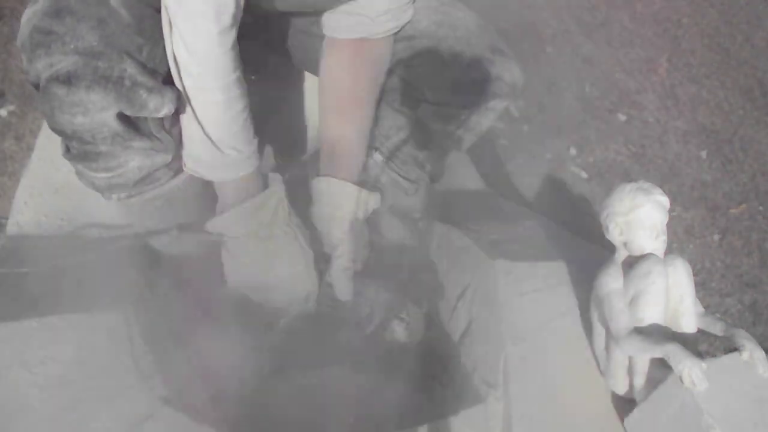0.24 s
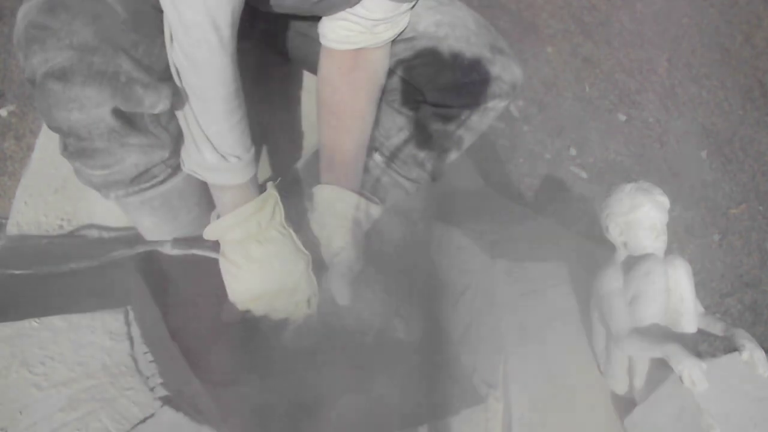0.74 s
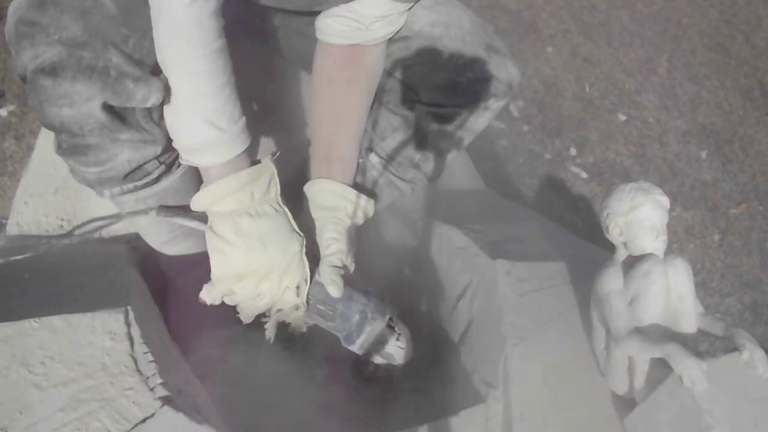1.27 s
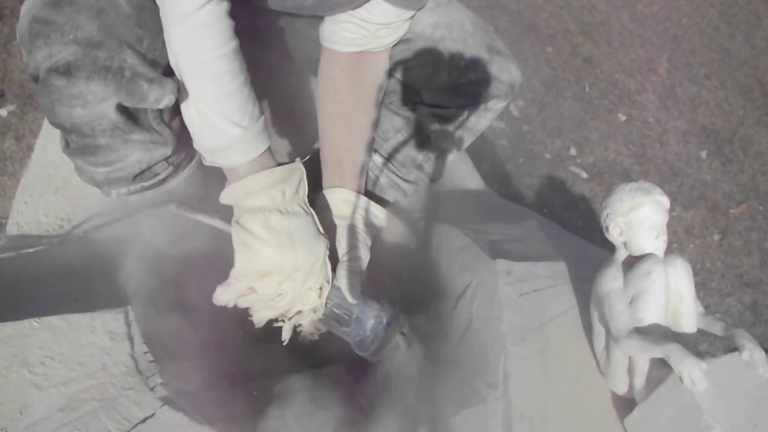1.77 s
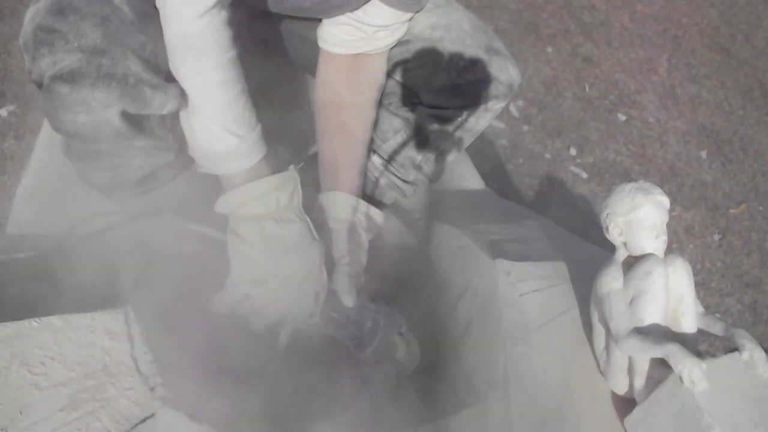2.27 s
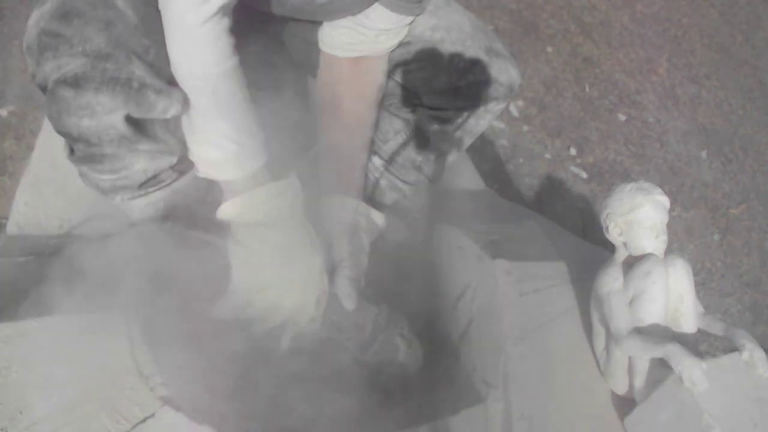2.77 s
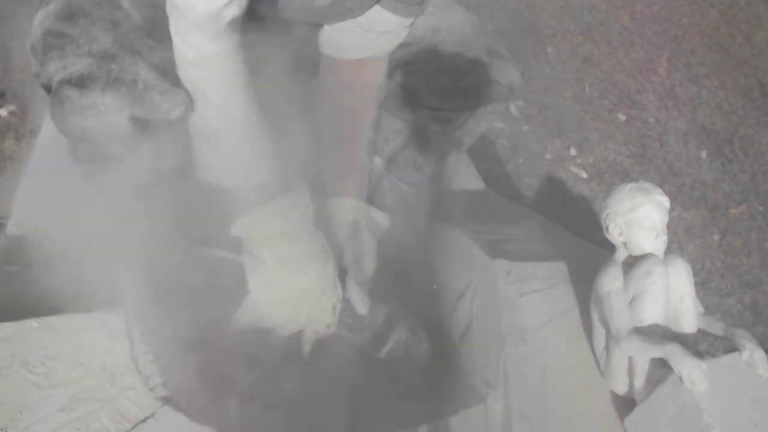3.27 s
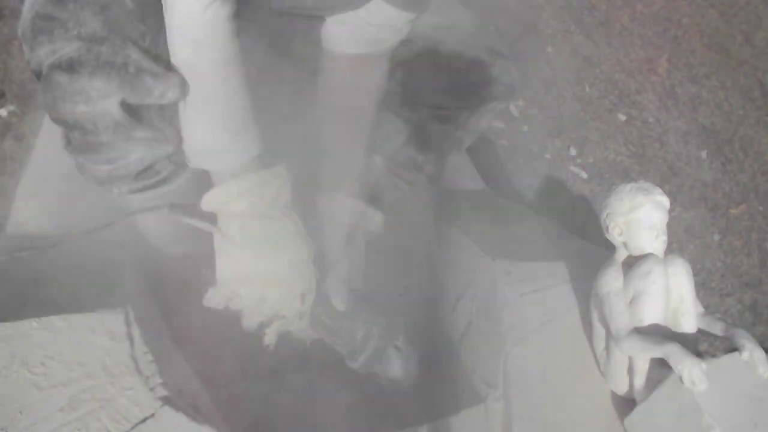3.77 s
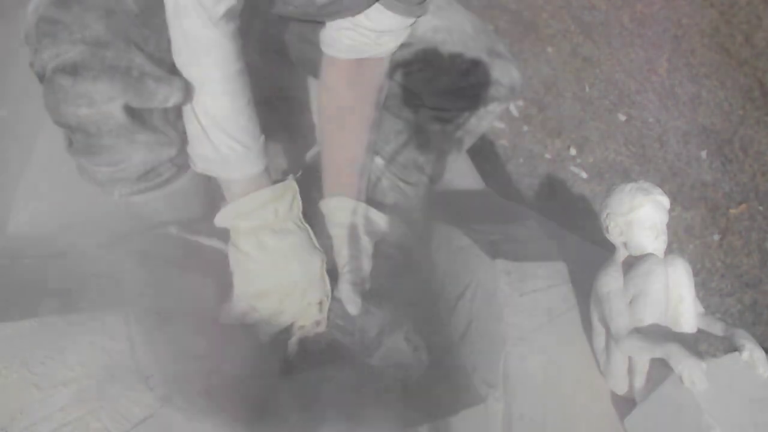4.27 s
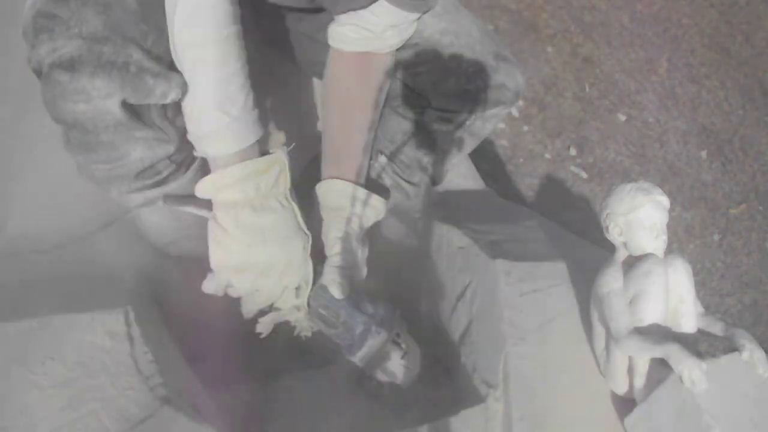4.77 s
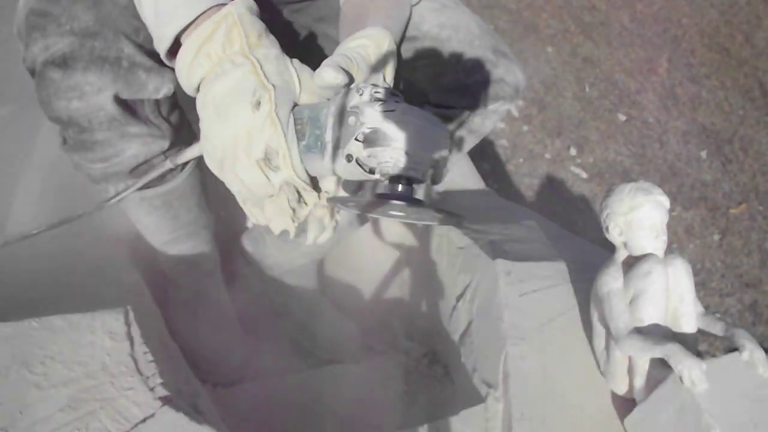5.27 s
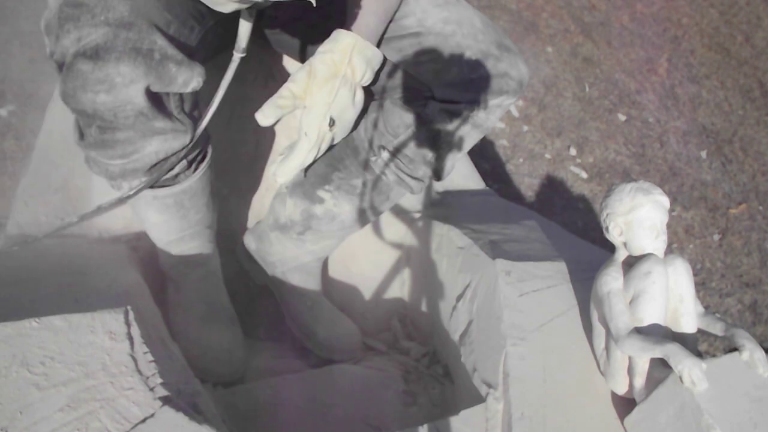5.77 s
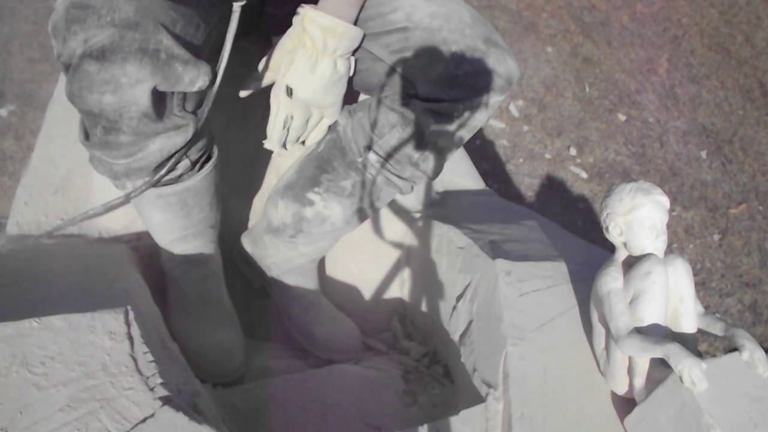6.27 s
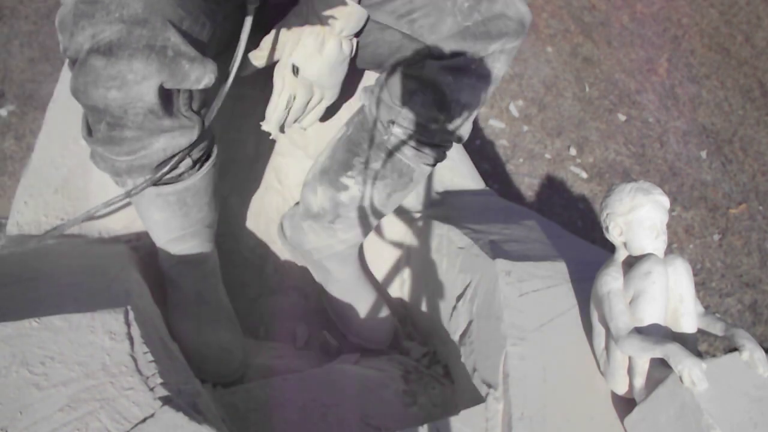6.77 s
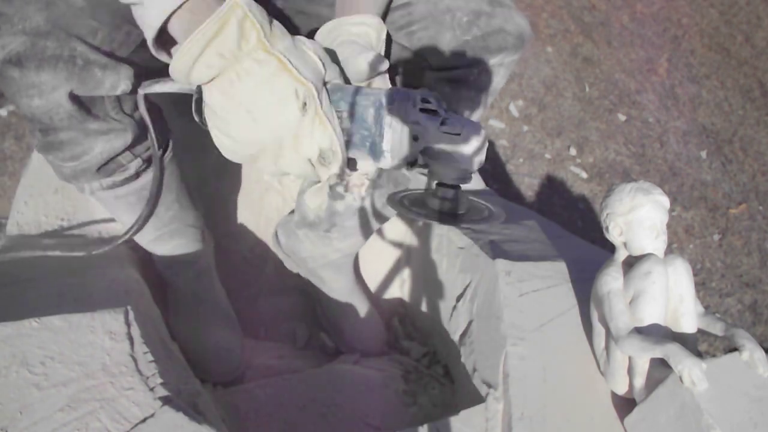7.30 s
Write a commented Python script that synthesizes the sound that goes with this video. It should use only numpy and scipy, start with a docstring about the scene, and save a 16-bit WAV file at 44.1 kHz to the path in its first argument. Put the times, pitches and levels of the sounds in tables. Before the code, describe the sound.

Outdoors, a grinder blade cuts stone with a shrill, ringing rasp, then spins freely with a hissing whir, light jingles and gusts.

```python
"""Outdoors, an angle grinder touches a stone block, cuts it in three passes, lifts and runs free.
The blade rim scrapes the stone once a turn and the steel disc rings; the motor fan roars over an
armature whine. Small metal parts jingle on the lifted tool. Gusts buffet the microphone, which
clips on the hardest bites; its peak near 3 kHz is built into the blade and fan spectra."""
import sys
import numpy as np
from scipy import signal
from scipy.fft import rfft, irfft, next_fast_len
from scipy.io import wavfile
from scipy.ndimage import uniform_filter1d, map_coordinates

SR = 44100
rng = np.random.default_rng(int(sys.argv[2]) if len(sys.argv) > 2 else 0)


def dump(signal):
    """Clip the signal to [-1, 1] and save it as 16-bit WAV at the path in sys.argv[1]."""
    limited = np.clip(np.atleast_2d(signal).T, -1, 1)
    pcm = np.round(limited * 32767).astype(np.int16)
    wavfile.write(sys.argv[1], SR, pcm)


N = 332514

# Blade in the stone, one list for the first touch and one per pass.
# Each row: time in seconds, level in dB, contact roughness in dB, share repeating each turn (0-1).
CONTACTS = [
    [(0.0, -20, 2, 0.55), (.045, -18, -1.5, .4)],
    [(.23, -21, 4, 0.1), (.345, -17, 2.5, 0.66), (.46, -12, 6.5, 0.4), (.575, -14, -2.5, 0.3),
     (.92, -15.5, -1.5, 0.18), (1.035, -15.5, -7, 0.2)],
    [(1.385, -14.5, -0.5, 0.82), (1.6, -13.5, 0.5, 0.63), (1.93, -16.5, 4.5, 0.64), (2.25, -14, 2, 0.67),
     (2.5, -17, 4.5, 0.53), (2.79, -13.5, 0, 0.13), (2.9, -17.5, 0.5, 0.5), (3.05, -11.5, -2, 0.04),
     (3.22, -14.5, -3.5, 0.82), (3.28, -19, 5, 0.9), (3.33, -13.5, 1.5, .7), (3.44, -18, 0, 0.5)],
    [(3.86, -12, 3, 0.9), (3.98, -14.5, -0.5, 0.84), (4.2, -14, -0.5, 0.72), (4.33, -11, -3.5, 0.7),
     (4.45, -15, -2.5, 0.85), (4.52, -14.5, 5.5, 0.58), (4.62, -11, 0, 0.57), (4.675, -19.5, -3, 0.8)],
]


def cutting(turns):
    """The rim drives the disc; hand pressure, chatter and skips vary the screech."""
    # Each row, one per contact: low scrape, high ring and grit in dB at 0 dB roughness.
    colour_db = [(-18.5, -7, -14), (-18, -5, -17.5), (-22.5, -9.5, -16), (-23, -11.5, -18.5)]
    # Gain of those three bands in dB per dB of roughness.
    rough_slopes = [.9, 0.74, 0.79]
    # Each row: time in seconds, main mode's share of the body sound in dB.
    mode_focus = [(.23, -7), (.39, -12), (.55, -1), (1.03, -0.6), (1.39, 0), (1.55, -3), (1.7, 0),
                  (1.86, -4), (2.02, -1.5), (2.2, -3), (2.5, -3.5), (2.63, -1.3), (3.0, -1.1), (3.26, -0.3),
                  (3.44, -12), (3.86, -2), (4.02, -4.5), (4.15, -1), (4.42, -1), (4.51, -2.5), (4.67, -.5)]
    # The rim skips off the stone. Each row: time in seconds, depth in dB, length in seconds.
    skips = [(0.238, 11, 0.0065), (0.468, 7, 0.065), (0.803, 9, 0.0076), (0.954, 12, 0.0065),
             (1.353, 4, .011), (1.604, 6.5, 0.01), (2.792, 5.5, 0.026), (2.933, 8, 0.0076),
             (3.06, 8.5, 0.038), (3.158, 15, 0.004), (4.333, 5.5, 0.028)]
    t = np.arange(N) / SR
    level_db, rough_db, share = curves(np.vstack(CONTACTS))
    contact = np.searchsorted([rows[-1][0] + .05 for rows in CONTACTS[:-1]], t)
    band_db = np.transpose(colour_db)[:, contact] + np.outer(rough_slopes, rough_db)
    low_db, ring_db, grit_db = band_db + [1.64 * wobble(7) for _ in rough_slopes]
    force = rim_scrape(turns, np.clip(share, 0, 1))
    pressure = np.minimum(wobble(40), .7)  # capped by the push of the hands
    chatter = amp(1.4 * pressure + .76 * wobble(120))
    parts = bands(blade(chatter * force), [150, 2000, 2880, 3280, 4000, 5200, 20000], slope=30)
    low, under, main, over, ring, grit = [even(p) for p in parts]
    focus = amp(np.minimum(curves(mode_focus)[0], -.15))  # a free disc screeches on one mode
    body = focus * main + np.sqrt(1 - focus ** 2) * (amp(-2) * under + amp(-4.5) * over)
    skip_db = sum(db * np.exp(-(1.43 * (t - s) / length_s) ** 4) for s, db, length_s in skips)
    mix = amp(low_db) * low + amp(-2.63) * body + amp(ring_db) * ring + amp(grit_db) * grit
    return touching() * amp(level_db - .02 * wobble(9) - skip_db) * mix


def rim_scrape(turns, share):
    """Contact force: coarse bumps of the wearing rim recur each turn amid fresh grit."""
    wear = np.arange(N) / SR * 9  # 9 new rim patterns a second
    rim = rng.standard_normal((int(wear[-1]) + 4, 84))
    angle = (turns + .004 * wobble(30)) % 1  # slightly uneven rotation
    repeat = unit(map_coordinates(rim, [wear, angle * rim.shape[1]], order=3, mode="grid-wrap"))
    grain_sizes = amp(3 * rng.standard_normal(N // 16 + 1)).repeat(16)[:N]
    fresh = unit(grain_sizes * rng.standard_normal(N))
    coarse = filtered(fresh, lambda hz: hz < 6000)
    return share * np.std(coarse) * repeat + np.sqrt(1 - share ** 2) * coarse + fresh - coarse


def blade(force):
    """Steel disc modes ring over a broad scrape; their levels differ in each pass."""
    # Each row: frequency in Hz, width in Hz, level in dB in passes one, two and three.
    modes = [(946, 12, -20.5, -88, -47), (1274, 79, -22.5, -24, -29), (1702, 220, -30, -19, -23.5),
             (2124, 12, -39, -5, -24), (2665, 420, -27, -4, -7.5), (3002, 175, 3, 0.5, 1),
             (3240, 320, 5, -10, -13), (3530, 440, -0.5, 2, -1.5), (4330, 150, -8, -8, -18),
             (4438, 210, -6.5, -15, -16), (4740, 250, -25, -14.5, -20), (5730, 410, -21, -20.5, -23.5),
             (6140, 89, -21, -18, -27), (7150, 110, -21, -43, -39), (7650, 500, -25.5, -24, -28),
             (9300, 250, -31, -31, -31), (10100, 1430, -23.5, -27.5, -29.5), (12200, 400, -40, -41, -38)]
    # Each row: frequency in Hz, scrape gain in dB.
    scrape_spectrum = [(100, -60), (200, -44.5), (700, -42.5), (2000, -39.5), (3000, -11), (4000, -15.5),
                       (5300, -30), (8600, -31), (11500, -38), (15700, -42)]
    # Boundaries between passes in seconds.
    boundaries_s = [1.2, 3.55]

    def response(hz, k):
        power = sum(amp(2 * db[k]) / (1 + (2 * (hz - mode_hz) / width_hz) ** 2) ** 1.81
                    for mode_hz, width_hz, *db in modes)
        return minimum_phase(power + colour(scrape_spectrum)(hz) ** 2)
    stage = np.searchsorted(boundaries_s, np.arange(N) / SR)
    return sum(filtered(force * (stage == k), lambda hz: response(hz, k)) for k in range(3))


def touching():
    """1 while the blade is in the stone."""
    t = np.arange(N) / SR
    inside = sum((t >= rows[0][0] - .02) & (t < rows[-1][0]) for rows in CONTACTS)
    return uniform_filter1d(inside * 1., size=400, mode="nearest")


def bites(ring_t60_s=.06):
    """Each bite is a burst of grit into the blade, which rings on briefly."""
    # Each row: start in seconds, force in dB, length in seconds, treble and ring in relative dB.
    strikes = [(.2130, -2, .013, 1, -8), (.9575, -7, .011, -1, -30), (.982, -6, .01, -2, -30),
               (1.0225, -8, .008, -5, -30), (1.0400, -17, .04, -6, -30), (1.0585, -12, .007, -3, -22),
               (1.3398, 13, .0135, -1, -26), (1.3550, -3, .005, -3, -30), (1.3715, -5, .014, 4, -20),
               (3.6310, 10, .015, 1, -22), (3.6838, -4, .021, 3, -9), (3.8430, 1, .016, 1, -9)]
    # Narrow rim modes. Each row: frequency in Hz, relative level in dB.
    rim_modes = [(4430, -8), (4651, -8), (5640, -18), (7090, -26)]
    force, ringing, t = np.zeros((2, N)), np.zeros(N), np.arange(N) / SR
    rasp_rad = .9 * wobble(160)  # the stone knocks the ring out of step
    for s, db, length_s, treble_db, ring_db in strikes:
        attack = (t >= s) * np.clip((t - s) / .0015 + .39, 0, 1)
        release = np.clip((s + length_s - t) / .0097, 0, 1)
        force += amp([[db], [db + treble_db]]) * attack * release
        age_s = np.clip(t - s, 0, 1)
        decay_db = 60 * np.maximum(age_s - length_s, 0) / ring_t60_s
        ring = sum(amp(mode_db + rng.normal(0, 4)) * np.sin(2 * np.pi * hz * age_s + k + rasp_rad)
                   for k, (hz, mode_db) in enumerate(rim_modes))
        ringing += np.clip(age_s / .0021, 0, 1) * amp(db + ring_db - decay_db) * ring
    body, treble = blade(force * rng.standard_normal(N))
    body = filtered(body, lambda hz: (hz < 5200) * highpass(hz, 2100, 4))
    treble = filtered(treble, lambda hz: hz >= 5200)
    return ringing + amp(5.5) * (body + treble)


def motor(turns, gear_ratio=3.456):
    """Fan air and armature tones sink behind the cut; the unbalanced spindle hums."""
    # Each row: time in seconds, roar in dB, deep roar and whine in dB relative to it.
    levels = [(.07, -24, -25, -26), (.2, -20.5, -20.5, -23), (1.075, -30, -20.5, -22),
              (1.205, -21, -25.5, -42), (1.335, -20.5, -24, -23), (3.47, -23.5, -19.5, -31),
              (3.62, -23, -27, -28), (3.72, -25, -24, -39), (3.83, -22, -20.5, -32), (4.7, -29.5, -20, -43),
              (4.83, -21.5, -25.5, -25), (5.0, -17.5, -24, -24), (5.165, -14, -26, -25.5),
              (5.19, -17.5, -27.5, -31), (5.49, -13.5, -27.5, -31), (5.65, -17, -30, -34),
              (5.8, -14, -29.5, -34), (6.08, -16, -33, -35), (6.22, -14.5, -31.5, -33),
              (6.66, -15.5, -32, -34), (6.95, -14, -31.5, -34), (7.1, -17.5, -29.5, -29),
              (7.25, -15.5, -26.5, -21.5), (7.54, -14.5, -22.5, -27.5)]
    # Each row: multiple of the armature speed, relative level in dB.
    harmonics = [(1, 1.5), (2, 0.5), (4, 7.5), (5, 16), (12, -17)]
    # Each row: time in seconds, hum level in dB.
    unbalance = [(.95, -74), (1.15, -48), (1.35, -51), (1.6, -65), (2.1, -55.5), (2.95, -51), (3.22, -57.5),
                 (3.5, -49), (4.1, -53), (4.28, -55), (4.5, -51), (5.65, -47), (6.0, -73), (7.54, -60)]
    roar_db, deep_db, whine_db = curves(levels)
    air = fan(deep_db)
    armature_rad = 2 * np.pi * gear_ratio * turns
    first, *upper = [amp(db + 1.5 * wobble(6)) * np.sin(k * armature_rad + .7 * wobble(20))
                     for k, db in harmonics]
    tones = (amp(whine_db) * first + amp(-26.5) * sum(upper)) * (1 - .32 * touching())
    hum = amp(curves(unbalance)[0]) * np.sin(2 * np.pi * turns)
    return amp(roar_db + .6 * wobble(7) - 7.7 * touching()) * (air + tones) + hum


def fan(deep_db):
    """Turbulent cooling air, strongest near 3 kHz."""
    # Each row: frequency in Hz, gain in dB before the bands are rebalanced.
    air_spectrum = [(120, -30), (250, -41), (800, -29), (1150, -16), (1760, -16.5), (2870, 6.5),
                    (3500, -2.5), (4140, -9), (5000, -11), (5860, -20.5), (7000, -23.5), (8200, -31.5),
                    (10000, -31.5), (12600, -37), (15700, -42)]
    swirl = amp(.6 * wobble(18) + 1.7 * wobble(150))
    air = filtered(swirl * rng.standard_normal(N), colour(air_spectrum))
    edges_hz = [150, 800, 2000, 4000, 6000, 7900, 11200, 20000]
    deep, low, body, mid, vent, hiss, top = bands(air, edges_hz, slope=24)
    low_db = -13.5 + .22 * (deep_db - deep_db.mean())
    roar = amp(deep_db) * deep + amp(low_db) * low + body + amp(-14) * mid
    treble = amp(-22) * vent + amp(-27.5) * hiss + amp(-34.5 + 1.2 * wobble(7)) * top
    return tool_movement(roar + treble)


def tool_movement(air, relative_width=.11):
    """Peaks in the hiss slide as the lifted tool moves."""
    # Each row: time in seconds, main peak in Hz.
    peak_path = [(4.75, 10400), (5.2, 9500), (5.55, 9100), (5.8, 7540), (6.0, 6700), (6.4, 6640),
                 (6.7, 7100), (7.0, 8050), (7.3, 9600), (7.54, 10400)]
    # Peaks and a hollow. Each row: multiple of the main peak's frequency, gain in dB.
    peaks = [(.58, 0.5), (1, 6), (1.27, -1), (1.75, 2)]
    hz, t, spectra = signal.stft(air, SR, nperseg=512)
    log_ratio = np.log((hz[:, None] + 1) / np.interp(t, *np.transpose(peak_path)))
    gain_db = sum(db * np.exp(-((log_ratio - np.log(k)) / relative_width) ** 2 / 2) for k, db in peaks)
    return signal.istft(spectra * amp(gain_db), SR, nperseg=512)[1][:N]


def singing(turns):
    """Spindle harmonics sing in set spans, as when they meet a low blade mode."""
    # Each row: start and end in seconds, multiple of the spindle speed, level in dB.
    spans = [(.35, .8, 6, -42), (.35, .62, 8, -41), (.35, .6, 10, -43), (1.45, 1.8, 8, -42),
             (1.42, 1.62, 14, -38), (3.95, 4.17, 14, -37), (4.0, 4.5, 11, -40)]
    return sum(amp(db + 2.1 * wobble(15)) * gate(start_s, end_s, fade_s=.054)
               * np.sin(2 * np.pi * k * turns + .4 * wobble(15)) for start_s, end_s, k, db in spans)


def jingles(faint_count=34, faint_from_s=5.2, chink_t60_s=.055, rattle_t60_s=.073):
    """Loose metal bits chink, each at its own pitch; fainter ones fall at random."""
    # Each row: start in seconds, level in dB, pitch in Hz.
    clear = [(5.8049, -24, 9300), (5.851, -29, 11000), (6.0314, -37, 10500), (6.0822, -35, 9200),
             (6.1356, -30, 10300), (6.3092, -24, 9200), (6.393, -30, 9300), (6.425, -30, 8930),
             (6.4928, -34, 9960), (6.5177, -28, 9640), (6.7083, -29, 9730), (6.8011, -32, 9800),
             (7.084, -26.5, 8860), (7.288, -36, 9870), (7.4566, -41, 10200), (7.4826, -32, 10100)]
    faint = [(faint_from_s + u * (N / SR - faint_from_s), -33.5 + 6 * (v - .5),
              9900 * (1 + .16 * (w - .5))) for u, v, w in rng.random((faint_count, 3))]
    out, t = np.zeros(N + SR), np.arange(SR // 10) / SR
    for s, db, hz in clear + faint:
        modes = sum(np.sin(2 * np.pi * hz * detune * t) for detune in 1 + rng.normal(0, .03, 3))
        chink = modes * amp(-60 * t / chink_t60_s)
        rattle = 1.8 * amp(-60 * t / rattle_t60_s) * rng.standard_normal(len(t))
        out[round(s * SR):][:len(t)] += amp(db) * (chink + rattle)
    # tiny parts radiate only treble
    return filtered(out[:N], lambda hz: highpass(hz, 8600, 12) / (1 + (hz / 12000) ** 8))


def tag_buzz():
    """A small metal tag rings and rattles against the housing."""
    # Each row: frequency in Hz, relative level in dB.
    modes = [(11430, 6), (12385, 10), (12870, -14), (13520, -10)]
    # Each row: start and end in seconds, level in dB.
    shakes = [(5.783, 5.944, -52), (6.13, 6.22, -53), (6.25, 6.352, -50), (6.42, 6.46, -51),
              (6.487, 6.61, -51), (6.64, 6.73, -50), (6.79, 6.934, -52), (7.42, 7.5, -54)]
    t = np.arange(N) / SR
    ring = sum(amp(db + 2.5 * wobble(30)) * np.sin(2 * np.pi * hz * t + 1.5 * wobble(90))
               for hz, db in modes)
    rattle = amp(-2) * bands(rng.standard_normal(N), [10800, 14500])[0]
    shaking = sum(amp(db) * gate(start_s, end_s, fade_s=.025) for start_s, end_s, db in shakes)
    return amp(2 * wobble(45)) * shaking * (ring + rattle)


def wind(port_hz=27, still_db=-68.5):
    """Lumpy pressure on the microphone port: a swelling breeze and gusts, some fluttering higher."""
    # Each row: time in seconds, buffet level in dB.
    breeze = [(0, -39), (.4, -31), (.8, -47), (1.13, -52), (1.36, -31.5), (1.85, -29.5), (2.18, -35),
              (2.3, -51), (3.3, -53), (4.0, -59), (4.37, -42), (4.5, -51), (4.8, -38), (5.04, -46),
              (5.5, -29.5), (6.1, -32.5), (6.4, -38), (6.6, -33), (7.0, -29.5), (7.54, -24)]
    # Each row: peak time in seconds, level in dB, length in seconds, relative flutter in dB.
    gusts = [(0.149, -21.5, 0.18, -20), (0.214, -27.5, .03, -5), (0.386, -38, 0.058, -21),
             (0.574, -38, 0.079, -22), (0.735, -34, .06, -18), (0.894, -38, .05, -25),
             (5.121, -20, 0.1, -27), (5.396, -38, 0.039, -26), (5.604, -24, 0.11, -21),
             (6.165, -19.5, 0.045, -20), (6.49, -30, 0.11, -28), (6.583, -27, 0.051, -35),
             (6.79, -21, 0.048, -23), (6.858, -23, .04, -15), (6.982, -23.5, 0.045, -15),
             (7.087, -24, .05, -26), (7.14, -26.5, .05, -16), (7.23, -30, 0.075, -7),
             (7.291, -22, 0.12, -17), (7.385, -26, 0.042, -18), (7.465, -29, 0.054, 0.5)]
    # Each row: frequency in Hz, relative gain in dB.
    pressure_spectrum = [(8.8, -29), (15, 15.5), (49, -1.5), (141, -15), (173, -20), (272, -26.5),
                         (400, -31.5), (520, -46), (880, -120)]
    t = np.arange(N) / SR
    buffet_gain = amp(curves(breeze)[0] + 4.4 * wobble(14))
    flutter_gain = buffet_gain * amp(-22 + 3.1 * wobble(14)) + amp(still_db)
    for s, db, length_s, flutter_db in gusts:
        puff = amp(db) * np.exp(-(2.3 * (t - s) / length_s) ** 2)
        buffet_gain += puff
        flutter_gain += amp(flutter_db) * puff
    lumps = amp(1.8 * wobble(25)) * rng.standard_normal(N)
    buffet, flutter = bands(filtered(lumps, colour(pressure_spectrum)), [5, 110, 500])
    pressure = buffet_gain * even(buffet) + flutter_gain * flutter
    return filtered(pressure, lambda hz: highpass(hz, port_hz, 3))


def amp(db):
    return 10 ** (np.asarray(db) / 20)


def unit(x):
    return x / np.sqrt(np.mean(x ** 2) + 1e-20)


def even(x):
    """x with its slow level divided out."""
    return x / np.sqrt(np.abs(uniform_filter1d(x ** 2, size=SR // 7)) + 1e-12)


def curves(rows):
    """One value per sample for each column after the time."""
    s, *cols = np.transpose(rows)
    return [np.interp(np.arange(N) / SR, s, c) for c in cols]


def gate(start_s, end_s, fade_s):
    """Trapezoid envelope."""
    t = np.arange(N) / SR
    return np.clip(np.minimum(t - start_s, end_s - t) / fade_s, 0, 1)


def wobble(rate_hz):
    """Smooth random curve, rate_hz knots a second."""
    knots = rng.standard_normal(int(N * rate_hz / SR) + 4)
    return map_coordinates(knots, [np.arange(N) * rate_hz / SR])


def filtered(x, response):
    """x through a frequency response."""
    m = next_fast_len(N + SR // 2)
    return irfft(rfft(x, m) * response(np.fft.rfftfreq(m, 1 / SR)), m)[..., :N]


def colour(points):
    """Response from (Hz, dB) points on a log axis."""
    f, db = np.transpose(points)
    return lambda hz: amp(np.interp(np.log(hz + 1), np.log(f + 1), db))


def highpass(hz, edge_hz, slope):
    return 1 / (1 + (edge_hz / (hz + 1)) ** slope)


def bands(x, edges_hz, slope=12):
    """x split at soft edges into parts of rms 1."""
    return [unit(filtered(x, lambda hz: highpass(hz, lo, slope) - highpass(hz, hi, slope)))
            for lo, hi in zip(edges_hz, edges_hz[1:])]


def minimum_phase(power):
    """Causal response with this power spectrum."""
    m = 2 * len(power) - 2
    cepstrum = irfft(np.log(power) / 2, m)
    cepstrum[1:m // 2] *= 2
    cepstrum[m // 2 + 1:] = 0
    return np.exp(rfft(cepstrum))


def scene():
    """Mono mix; one spindle times the scrape, motor tones and singing."""
    # Speed sags under load. Each row: time in seconds, turns per second.
    spindle_speed = [(.25, 164), (.45, 159), (.75, 160.6), (1.0, 160.5), (1.12, 164.5), (1.36, 164),
                     (1.57, 157.5), (1.74, 159.4), (1.86, 157), (2.1, 155.9), (2.42, 157.3), (3.2, 154),
                     (3.45, 165), (3.8, 165), (3.86, 160.7), (4.19, 156.7), (4.42, 158), (4.6, 163),
                     (7.54, 162.6)]
    turns = np.cumsum(curves(spindle_speed)[0]) / SR
    return (cutting(turns) + bites() + motor(turns) + jingles() + tag_buzz() + wind()
            + singing(turns))[None]


def record(dry):
    """The input clips at full scale and passes nothing above 15.75 kHz."""
    clipped = dry / (1 + np.abs(dry) ** 12) ** (1 / 12)
    return filtered(clipped, lambda hz: hz < 15750)


dry = scene()
out = record(dry)
dump(out)
```